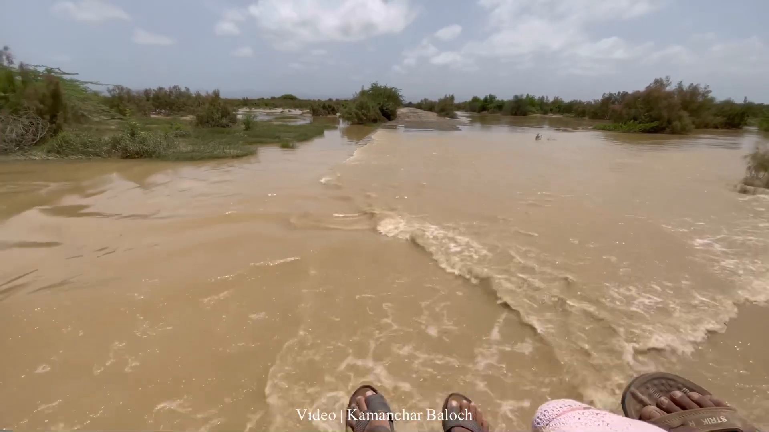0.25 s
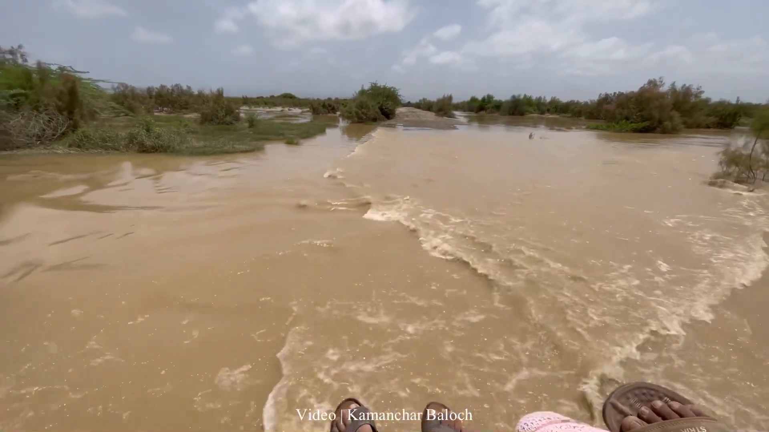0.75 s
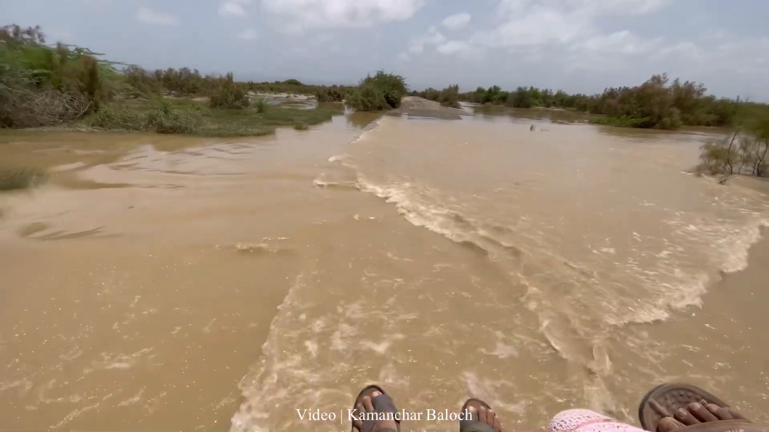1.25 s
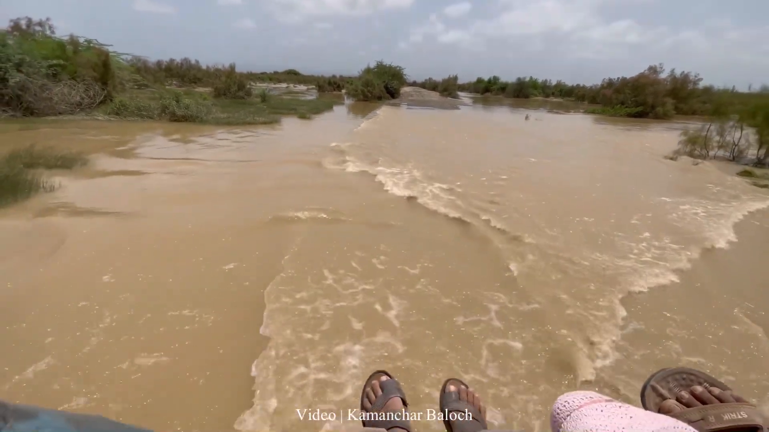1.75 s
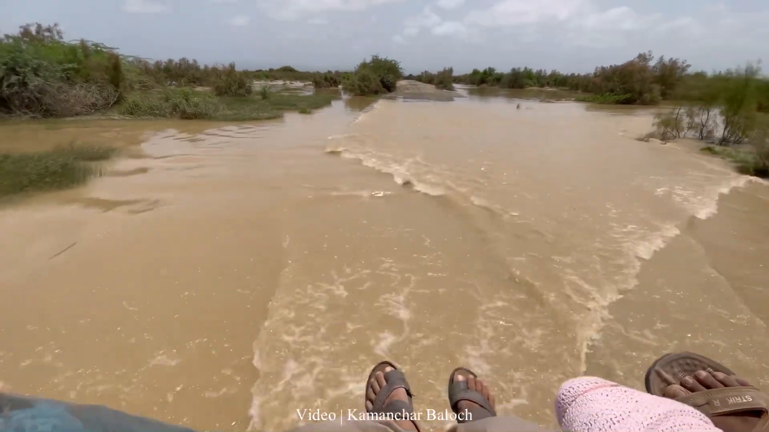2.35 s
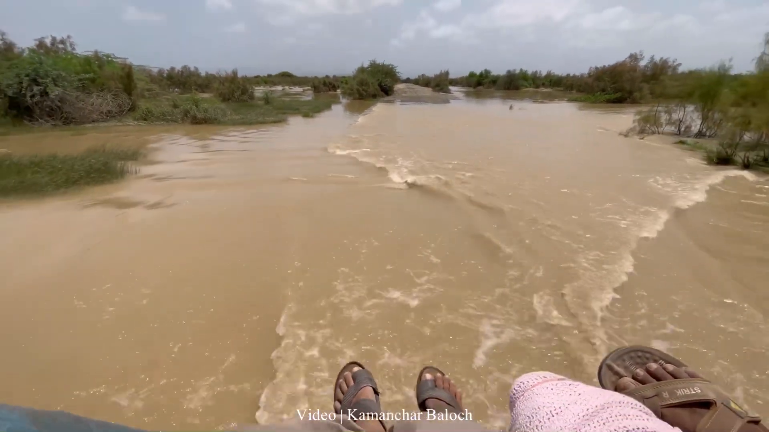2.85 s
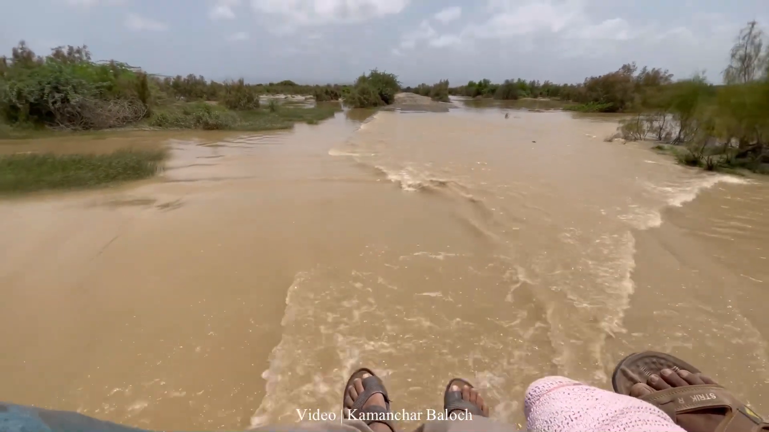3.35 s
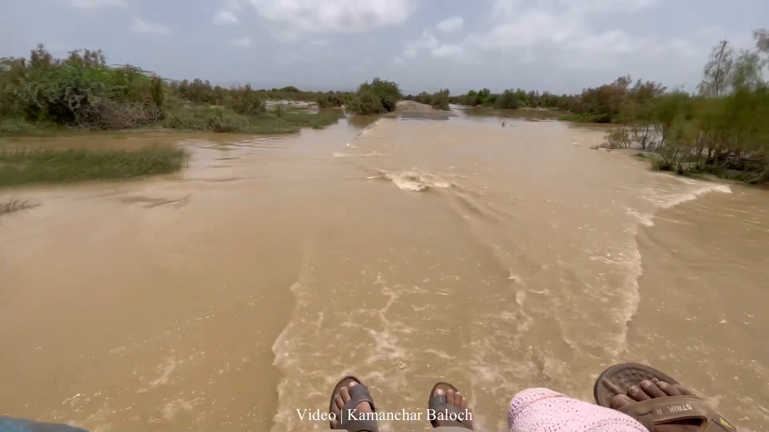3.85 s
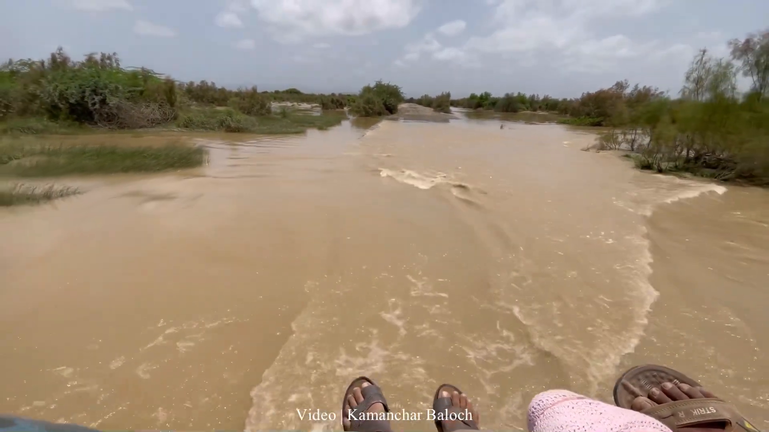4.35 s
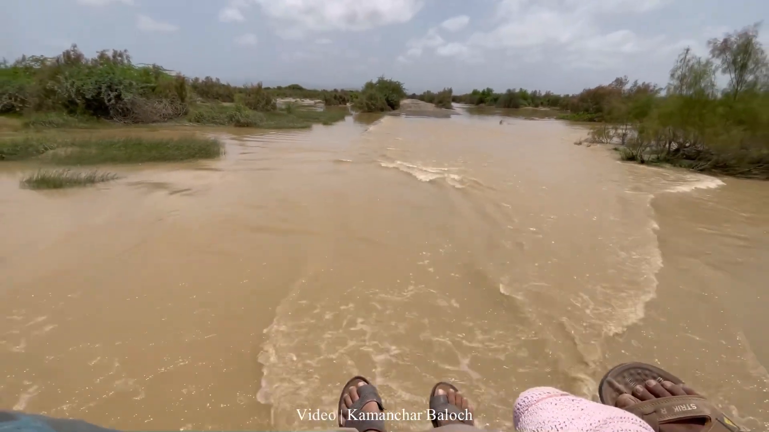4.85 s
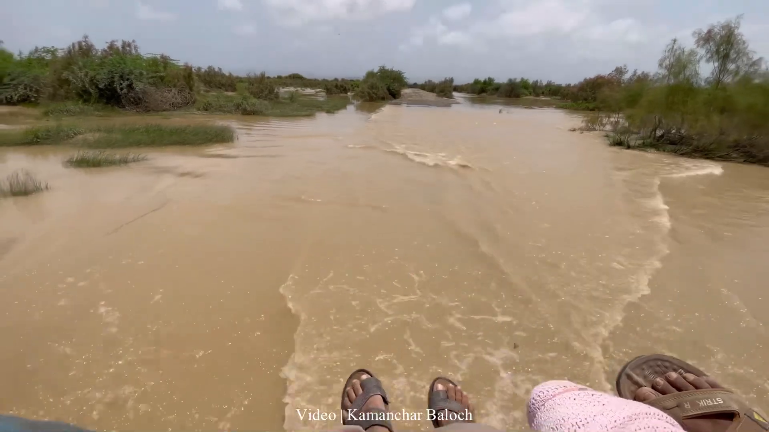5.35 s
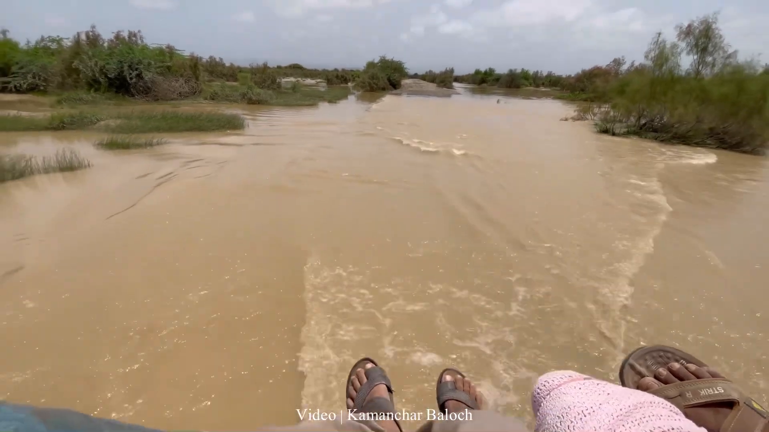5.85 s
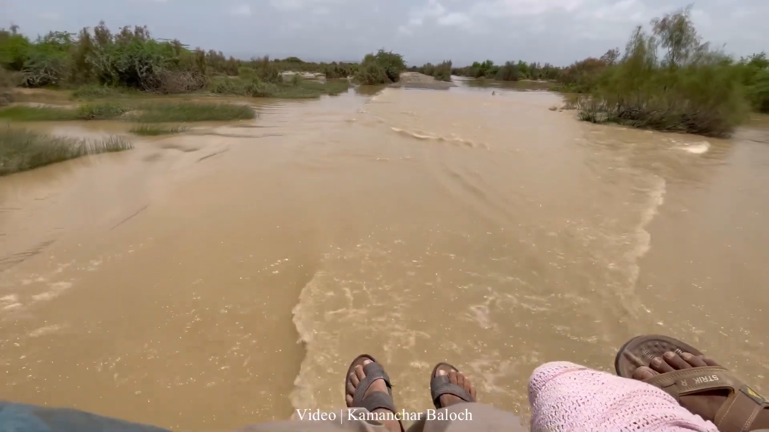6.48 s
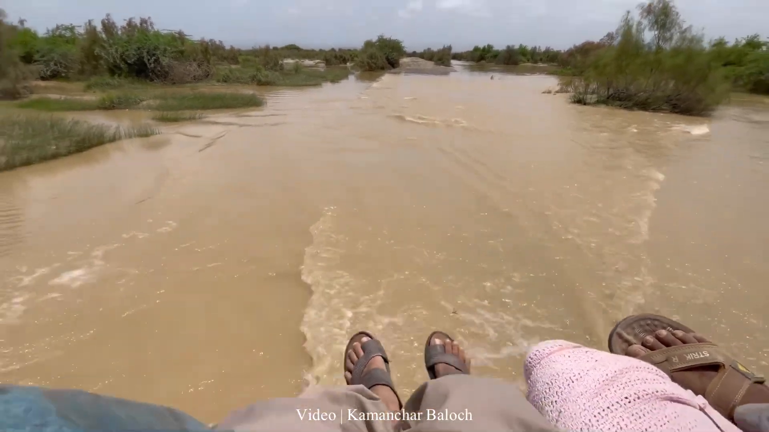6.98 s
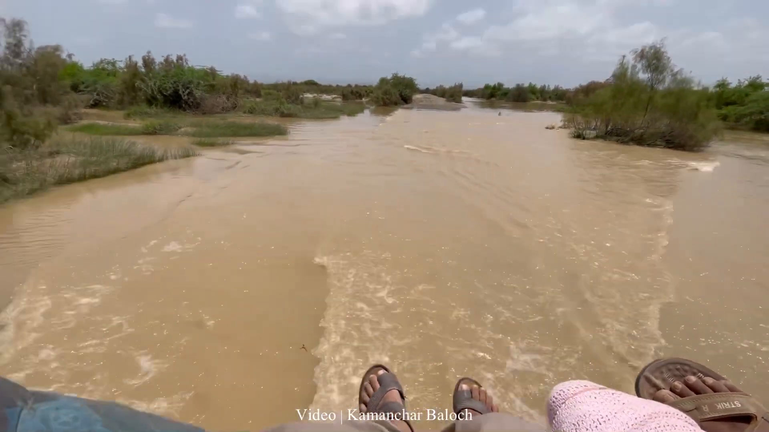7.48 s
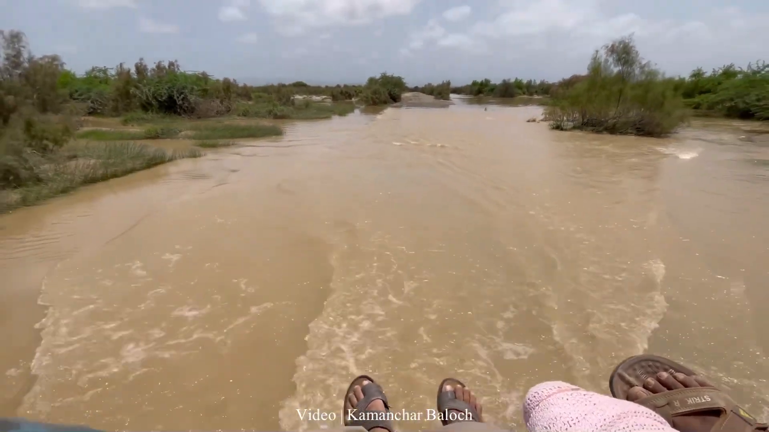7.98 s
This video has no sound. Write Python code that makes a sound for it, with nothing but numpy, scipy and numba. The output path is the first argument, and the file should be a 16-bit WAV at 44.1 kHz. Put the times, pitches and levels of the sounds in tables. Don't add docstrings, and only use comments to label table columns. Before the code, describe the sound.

A diesel engine drones low and steady with a gear whine while muddy floodwater rushes, froths and splashes close around a towed trailer.

```python
import sys
import numpy as np
from scipy import signal
from scipy.fft import rfft, irfft, next_fast_len
from scipy.io import wavfile
from scipy.ndimage import uniform_filter1d
from numba import njit

SR = 44100
rng = np.random.default_rng(int(sys.argv[2]) if len(sys.argv) > 2 else 0)


def generate_wav(sig):
    pcm = np.round(np.clip(np.atleast_2d(sig).T, -1, 1) * 32767).astype(np.int16)
    wavfile.write(sys.argv[1], SR, pcm)


def voltage_ratio(decibels):
    exponent = np.asarray(decibels, float) / 20
    return 10 ** exponent


N = 362502
TIME = np.arange(N) / SR

# time in seconds, firing rate in Hz, load in dB.
ENGINE = [(0.0, 37.92, 4.5), (0.45, 37.87, -1), (1.25, 39.07, 2), (1.58, 39.44, -1), (1.9, 40.58, 1.5),
          (3.79, 40.8, -3), (3.9, 39.5, -2.5), (4.2, 40.4, -2.5), (4.7, 39.2, 0), (5.1, 40.2, -5.5),
          (5.6, 41.23, -0.5), (6.0, 42.5, 2), (6.36, 43.5, 4), (6.85, 43.27, -1), (6.99, 42.14, -2.5),
          (7.16, 42.78, 1), (7.55, 42.78, -4), (8.22, 42.78, 1)]
# time in seconds, level in dB.
FLOW = [
    (0, 2.5),
    (.8, 3.5),
    (1.7, 1.5),
    (2.7, 0.5),
    (2.85, -1),
    (4.28, -2),
    (5.13, -5),
    (6.4, -2),
    (7.2, -2),
    (8.22, -5.5),
]
# centre in seconds, lift in dB, length in seconds.
SPLASH = [(.75, 1, .04), (1.14, 2, .02), (1.536, 5, .01), (1.67, 1, .03), (2.36, 1.5, .042),
          (2.463, 5, .012), (2.7, 1.5, .069), (3.8, 1, .03), (4.18, 2, .02), (6.778, 5, .013),
          (6.828, 4, .03), (6.958, 5, .03), (7.015, 6, .055), (7.256, 7, .012)]
# pitch in Hz, left and right level in dB per Hz,
# likeness of the ports from 0 to 1, lead of the left in radians.
WASH = [(30, -60, -62, .95, .1), (60, -50, -51.5, .91, .1), (105, -50, -51, .92, .05),
        (150, -53, -55, .92, 0), (230, -56, -60, .75, .3), (340, -58, -61.5, .5, .6),
        (500, -61.5, -68, .15, 1.5), (650, -65, -72, .35, 2.6), (850, -63, -68, .2, .8),
        (1150, -65, -70.5, .05, 3), (1480, -70.5, -74, .4, 3), (1900, -71, -74.3, .2, 5),
        (2400, -75, -76, .3, 5.3), (2750, -76, -76, .4, 4), (3150, -75.5, -77.5, .5, 3)]
# centre in Hz, width in Hz, lift in dB.
BOOMS = [(42.9, 4.4, 6), (77.6, 5.4, 4), (84.7, 2.1, 3), (129.6, 10.5, 4.5), (258.7, 8.8, 2.5),
         (292, 61, 0.5)]


def curve(table):
    s, *columns = np.transpose(table)
    return [np.interp(TIME, s, column) for column in columns]


def swells(table):
    return sum(db * np.exp(-(2 * (TIME - s) / length) ** 2 / 2) for s, db, length in table)


def step(s, fade_s):
    return .5 + .5 * np.tanh((TIME - s) / fade_s)


def lift(hz, table):
    return sum(db / (1 + (2 * (hz - centre_hz) / width) ** 2) for centre_hz, width, db in table)


def walk(rate, count):
    hold = int(SR / rate)
    s = np.arange(N // hold + 2) * hold / SR
    steps = rng.standard_normal((count, len(s)))
    coarse = np.array([np.interp(TIME[::64], s, row) for row in steps])
    smooth = 1.3 * uniform_filter1d(coarse, max(hold // 64, 1), axis=1)
    return np.repeat(smooth, 64, axis=1)[:, :N]


def pan(x, db):
    return x * voltage_ratio(np.array([db, -db]) / 2)[:, None]


@njit
def ring(start, hz, cycles, size, glide, length):
    out = np.zeros(length)
    for k in range(len(start)):
        span = int(cycles[k] * SR / hz[k])
        phase, gain, fade = 0., size[k], np.exp(-5 / span)
        for i in range(start[k], min(start[k] + span, length)):
            phase += 2 * np.pi * hz[k] * (1 + glide * (i - start[k]) / span) / SR
            out[i] += gain * np.sin(phase)
            gain *= fade
    return out


def froth(rate, cycles, scatter_db, share_db):
    when, pitch, luck = rng.random((int(rate * N / SR), 3)).T
    hz = 300 + 12500 * pitch
    size = voltage_ratio(-scatter_db * np.log(0.036 + luck)) * np.sqrt(hz)
    bubbles = ring((when * N).astype(np.int64), hz, cycles + 0 * hz, size, 0.12, N)
    return rng.standard_normal(N) + voltage_ratio(share_db) * bubbles / bubbles.std()


def ports(shared, own, table, low_hz, top_hz):
    size = next_fast_len(N)
    f = np.fft.rfftfreq(size, 1 / SR) + 1
    hz, *columns = np.transpose(table)
    left_db, right_db, like, lead = (np.interp(np.log(f), np.log(hz), c) for c in columns)
    like = np.clip(like, 0, 1)
    band = np.sqrt(SR / 2 / (1 + (low_hz / f) ** 12) / (1 + (f / top_hz) ** 12))
    a, b = rfft(shared, size), rfft(own, size)
    right = like * np.exp(-1j * lead) * a + np.sqrt(1 - like ** 2) * b
    return irfft(np.array([voltage_ratio(left_db) * a, voltage_ratio(right_db) * right]) * band, size)[:, :N]


def flicker(x, patch_db, rate):
    f, s, z = signal.stft(x, SR, nperseg=256)
    at = np.minimum((s * SR).astype(int), N - 1)
    patches = walk(rate, count=14)[:, at]
    patches = patches + .5 * np.roll(patches, 1, axis=0) + .5 * np.roll(patches, -1, axis=0)
    row = np.clip(2 * np.log2((f + 1) / 170), 0, 13).astype(int)
    return signal.istft(z * voltage_ratio(patch_db * patches[row]), SR)[1][..., :N]


def breeze():
    b, a = signal.butter(1, (32, 60), "band", fs=SR)
    air = signal.lfilter(b, a, rng.standard_normal((2, N)))
    return air / air.std() * voltage_ratio(-40 + 4.5 * walk(6.8, count=2))


def hull():
    # centre in seconds, lift in dB, length in seconds.
    surges = [
        (.11, 1, .1),
        (.6, 3.5, 0.11),
        (1.1, 5.5, 0.32),
        (2.12, 4.5, 0.49),
        (2.92, 5, 0.27),
        (3.68, 6, 0.18),
        (6.1, 3.5, 0.72),
        (6.7, 8.5, 0.074),
        (7.05, 4.5, 0.24),
        (7.65, -1.5, .2),
    ]
    low = rng.standard_normal((2, N))
    drone = ports(*low, WASH, low_hz=20, top_hz=165)
    rumble = ports(*low, WASH, low_hz=200, top_hz=399)
    return drone * voltage_ratio(-2.5) + rumble * voltage_ratio(-2 + swells(surges))


def bow_rush():
    water = flicker([froth(2000, cycles=80, scatter_db=2, share_db=-3) for _ in range(2)], patch_db=.35, rate=11)
    heavy = [row for row in SPLASH if row[2] > .025]
    slap = ports(*water, WASH, low_hz=1600, top_hz=3350) * (voltage_ratio(.7 * swells(heavy)) - 1)
    rush = ports(*water, WASH, low_hz=366, top_hz=3110) + slap
    return rush * voltage_ratio(-2 + .23 * curve(FLOW)[0] + .1 * swells(SPLASH))


def spray_and_mist():
    # pitch in Hz, left and right level in dB per Hz, likeness of the ports from 0 to 1, lead of the left in
    colour = [(3300, -75.5, -78.5, .39, 2.9), (3900, -80.5, -84, .14, 3.1), (4600, -81, -84.5, .31, .9),
              (5300, -83.5, -88, .18, 3.5), (6300, -84, -89, .37, .5), (8100, -83.5, -85.5, .23, -.5),
              (8800, -86, -85.5, .2, -.8), (9450, -86, -85.5, .65, -2.3), (9750, -85.4, -85.4, .97, -3.0),
              (10350, -84, -84, .98, -3.2), (10600, -84, -84.3, .96, -3.4), (11000, -83, -83.7, .8, -4.3),
              (11750, -91, -91, .97, -6.1), (12350, -97.5, -97.5, .99, -6.3),
              (12800, -105, -105, .99, -6.3)]
    wave_db, slap_db = curve(FLOW)[0], swells(SPLASH)
    fine = flicker([froth(2500, cycles=40, scatter_db=6.0, share_db=-7.5) for _ in range(2)], patch_db=.6, rate=4)
    spray = ports(*fine * voltage_ratio(.35 * walk(25, count=1)), colour, low_hz=3400, top_hz=6800)
    mist = ports(*fine * voltage_ratio(.8 * walk(28, count=1)), colour, low_hz=6800, top_hz=14000)
    finest_db = -6 + .5 * wave_db + 3.2 * walk(30, count=1)
    mist += ports(*fine, colour, low_hz=11000, top_hz=14000) * voltage_ratio(finest_db)
    mist += ports(*fine, colour, low_hz=8500, top_hz=10900) * voltage_ratio(-13 + 1.8 * wave_db)
    fleck = ports(*rng.standard_normal((2, N)), colour, low_hz=9400, top_hz=10800)[0]
    mist += fleck * voltage_ratio(-17 + slap_db + 7 * walk(30, count=1))
    spray_db = -1 + .56 * wave_db + .62 * slap_db
    mist_db = -6 + .49 * wave_db + slap_db
    return spray * voltage_ratio(spray_db) + mist * voltage_ratio(mist_db)


def jet():
    b, a = signal.iirpeak(2340, 5.2, fs=SR)
    hiss = signal.lfilter(b, a, signal.lfilter(b, a, rng.standard_normal((2, N))))
    open_db = -55 + 9.5 * step(4.75, fade_s=.1)
    db = open_db + .45 * curve(FLOW)[0] + .3 * swells(SPLASH)
    return hiss / hiss.std() * voltage_ratio(db + .8 * walk(14, count=2))


def bubble_rings(table, cycles, trim_db):
    s, db, hz, pan_db = np.transpose(table)
    start = (s * SR).astype(np.int64)
    sizes = [voltage_ratio(db + trim_db + side * pan_db / 2) for side in (1, -1)]
    return np.array([ring(start, hz, cycles + 0 * hz, size, 0.036, N) for size in sizes])


def drops():
    # start in seconds, peak in dB, pitch in Hz, left minus right in dB.
    ticks = [(0.495, -32, 10900, -2), (0.5242, -37, 8200, 2.0), (1.1134, -39, 6670, 1.5),
             (1.1369, -28, 7450, 3), (1.3513, -35, 9000, -2), (1.4097, -35, 8050, 2.0),
             (1.536, -40, 6840, 2), (2.0457, -32, 8984, -1), (2.3176, -41, 5934, 1.5),
             (2.4648, -29, 11150, 2.5), (2.5695, -29, 6726, 0), (2.7003, -34, 6140, 2.0),
             (4.1776, -34, 6930, 0.5), (4.3001, -39, 6400, 1.0), (5.884, -39, 6506, 1),
             (6.1554, -41, 5620, 1), (5.5079, -37, 5450, 0), (6.7765, -33, 6622, 3.0),
             (6.8742, -46, 5066, -2), (6.9599, -30, 8780, 1), (7.0065, -30, 8900, 2.0),
             (7.2515, -36, 6445, 0.5), (7.3077, -34, 6160, 2.5), (7.5741, -37, 6865, 2.0)]
    return bubble_rings(ticks, cycles=67, trim_db=-5)


def gulps():
    # start in seconds, peak in dB, pitch in Hz, left minus right in dB.
    bubbles = [(0.5352, -28, 1890, -1), (1.6142, -26, 1610, 3.5), (1.853, -27, 3070, 1.5),
               (2.16, -27, 2830, 1.5), (2.2563, -37, 1790, 2.0), (4.4633, -36, 2373, 1.0),
               (5.6994, -27, 2440, 2.5), (5.8935, -28, 2180, 0), (6.549, -31, 2623, 2),
               (6.9591, -40, 1854, 2.0), (7.6884, -35, 2302, 2.5)]
    return bubble_rings(bubbles, cycles=27, trim_db=-3.5)


def membrane_swings(table, sign):
    out = np.zeros((2, N))
    for (s, db, hz, length, pan_db), turn in zip(table, rng.random(len(table))):
        at = slice(int((s - .1) * SR), int((s + .15) * SR))
        t = TIME[at] - s
        width = np.where(t < 0, 0.28 * length, 0.5 * length)
        swing = np.exp(-(t / width) ** 2) * np.cos(2 * np.pi * (hz * t + turn))
        out[:, at] += pan(voltage_ratio(db) * swing, pan_db)
    return out * np.array([[1], [sign]])


def gusts():
    # centre in seconds, peak in dB, pitch in Hz, length in seconds, left minus right in dB.
    puffs = [(1.983, -23, 70, 0.038, -10), (2.072, -28, 110, 0.092, -6), (2.391, -27, 90, .03, -7),
             (2.843, -15, 110.1, 0.019, 7), (2.885, -28, 70.6, 0.039, 6), (2.97, -20, 90, 0.027, -1),
             (3.026, -25, 74.6, 0.043, -6), (3.079, -25, 70.3, 0.054, 7), (3.258, -29, 90.1, 0.036, 5),
             (3.45, -33, 79.4, 0.042, -3), (4.828, -26, 60, 0.04, 23), (5.274, -20, 99.2, 0.031, -1),
             (5.319, -26, 70, 0.046, -18), (5.42, -30, 60.4, 0.042, -6), (6.024, -29, 70.04, 0.046, 7),
             (6.302, -26, 80.6, .03, 2)]
    return membrane_swings(puffs, sign=-1)


def jolts():
    # centre in seconds, peak in dB, pitch in Hz, length in seconds, left minus right in dB.
    bumps = [
        (.582, -10.5, 132, 0.013, 4),
        (.628, -17, 118, 0.024, 5),
        (2.88, -17.5, 100, 0.017, 6),
        (3.75, -33, 206, 0.04, -1),
        (6.354, -9, 145, 0.01, 4),
        (6.378, -12.5, 110.7, 0.021, 2),
        (6.746, -8.5, 141, 0.012, 4),
    ]
    return membrane_swings(bumps, sign=1)


def gear(cycle, teeth, db, rough_db, left_db, right_db, lead):
    load, slip = walk(17, count=2)
    phase = 2 * np.pi * teeth * cycle + .5 * slip
    size = np.sqrt(2) * voltage_ratio(db + rough_db * load)
    return size * np.array([voltage_ratio(left_db) * np.sin(phase), voltage_ratio(right_db) * np.sin(phase - lead)])


def gears(cycle):
    # centre in seconds, lift in dB, length in seconds.
    slack = [(1.55, -20, 0.18), (.8, -8, 0.19), (2.7, -4, 0.16), (3.25, 2, 0.69), (4.0, -16, 0.19),
             (4.5, -4, 0.26), (4.8, 2, .2), (5.18, -5, .2), (5.5, 2, .25), (6.15, -6, .1), (6.65, 2, .25),
             (6.92, -10, 0.072), (7.15, -7, 0.21), (7.4, 2, .25)]
    # time in seconds, level in dB.
    mesh = [(0, 8), (.9, 9), (1.3, 4.5), (1.8, 5), (2.4, -4), (4.4, -1), (5.4, -1), (5.9, 2.5), (6.3, -2),
            (6.9, 1), (7.1, -3), (7.3, 5), (8.22, 0.5)]
    # teeth per firing, level in dB, left in dB, right in dB.
    overtones = [(8.5, -52, 1, -4), (9.5, -56, 1, -3), (13.7, -50, 1, -7), (18, -54, 1, -5),
                 (21, -52, 1, -6), (24.4, -57, 1, -5), (27.5, -56, 1, -5)]
    pull_db = 5.5 * (step(4.9, fade_s=.3) - step(6.85, fade_s=.3))
    low, high = 6.85, 10.5
    low_db = -43.5 + pull_db + swells(slack) + lift(low * firing_hz(), BOOMS)
    high_db = -47.5 + curve(mesh)[0]
    whine = gear(cycle, low, low_db, rough_db=3, left_db=6, right_db=-4, lead=2.14)
    whine += gear(cycle, high, high_db, rough_db=2.4, left_db=1, right_db=-.59, lead=.79)
    for teeth, db, left_db, right_db in overtones:
        whine += gear(cycle, teeth, db + pull_db / 2, 2.5, left_db, right_db, lead=1.5)
    return whine


def firing_hz():
    # centre in seconds, change of firing rate in Hz, length in seconds.
    lurches = [(2.9, -.5, .2), (3.66, .5, .15), (4.6, .3, .15), (4.9, -.5, .2), (5.15, .35, .15),
               (5.9, .35, .2), (6.15, -.5, .2), (6.9, -.4, .15), (7.3, .2, .2), (7.65, -.5, .3),
               (7.95, .3, .2)]
    return curve(ENGINE)[0] + swells(lurches)


def engine():
    # level off resonance in dB, share of the load.
    tones = [
        (-31.5, 0.13),
        (-30, 0.92),
        (-32, 0.78),
    ]
    # multiple, dB re unevenness.
    uneven = [(1.25, -10), (1.5, -13), (1.75, -12), (2.25, -9), (2.5, -11), (2.75, -8), (3.25, -4.5),
              (3.5, -8), (3.75, -13), (4, -11), (4.25, -19), (4.5, -16), (5, -14)]
    # centre in Hz, width in Hz, lift in dB.
    chambers = [(112, 8, -0.5), (132.9, 9.1, 6), (163.3, 11, 5.5)]
    # centre in seconds, lift in dB, length in seconds.
    body_boom = [(.2, 2.5, .4), (.6, 0.5, .2), (.95, 1.5, 0.23), (1.3, 1, .25), (1.6, -3, .2),
                 (2.2, 0.5, .4), (2.7, -1, .25), (3.65, -0.5, 0.18), (4.1, -1, 0.45), (4.7, 4, 0.56),
                 (5.3, 1.5, 0.39), (6.05, 0.5, 0.21), (6.65, -2, .2), (7.7, 1, 0.27)]
    governed_hz, load_db = firing_hz(), curve(ENGINE)[1]
    hz = governed_hz * (1 + .002 * walk(6, count=1)[0])
    cycle = np.cumsum(hz) / SR + 1.3

    def lag(k):
        return 2.6 * (1 - np.exp(3 * (1 - k)))

    boom = np.zeros(N)
    for k, (db, share), drift in zip((1, 2, 3), tones, walk(5.4, count=3)):
        tone_db = db + share * load_db + lift(k * governed_hz, BOOMS) + .9 * drift
        if k == 2:
            tone_db = tone_db + swells(body_boom)
        boom += voltage_ratio(tone_db) * np.cos(2 * np.pi * k * cycle - lag(k))

    lumps = np.zeros(N)
    sizes, slips = walk(2.8, count=len(uneven)), walk(1.34, count=len(uneven))
    for (k, db), size, slip in zip(uneven, sizes, slips):
        spread = 8 * (k - 3) ** 2
        lump_db = db + lift(k * hz, chambers) + size
        lumps += voltage_ratio(lump_db) * np.cos(2 * np.pi * k * cycle - lag(k) - spread + .45 * slip)
    uneven_db = -33.5 - 2 * np.maximum(governed_hz - 41.37, 0)

    sound = np.sqrt(2) * (boom + voltage_ratio(uneven_db) * lumps)
    late = np.interp(TIME - .0003, TIME, sound)
    return np.array([sound * voltage_ratio(.8), late * voltage_ratio(-.8)]), cycle


def scene():
    exhaust, cycle = engine()
    shake = voltage_ratio(.5 * np.cos(2 * np.pi * cycle))
    water = hull() + (bow_rush() + spray_and_mist()) * shake + jet()
    blows = gusts() + jolts()
    return breeze() + water + drops() + gulps() + blows + gears(cycle) + exhaust


def low_pass(x):
    return signal.sosfilt(signal.butter(12, 13080, fs=SR, output="sos"), x)


def record(dry):
    clear = signal.sosfilt(signal.butter(2, 25, "high", fs=SR, output="sos"), dry)
    rounded = np.tanh(1.5 * clear) / 1.5
    return low_pass(rounded)


dry = scene()
out = record(dry)
generate_wav(out)
```